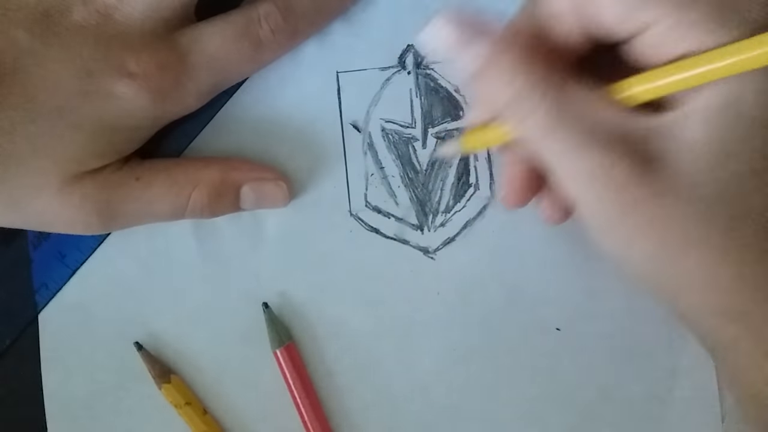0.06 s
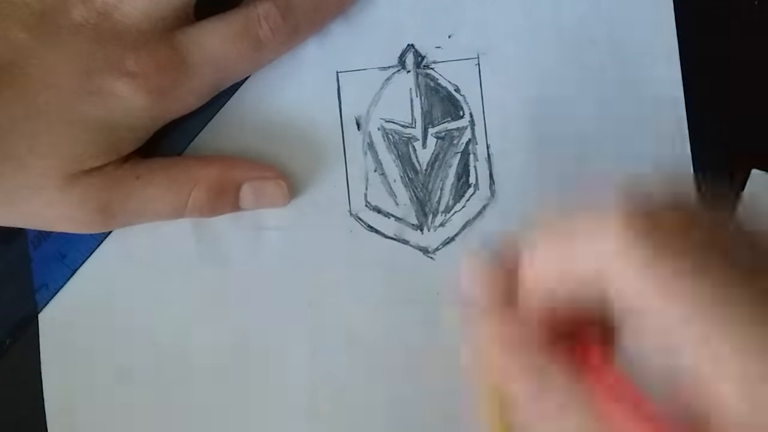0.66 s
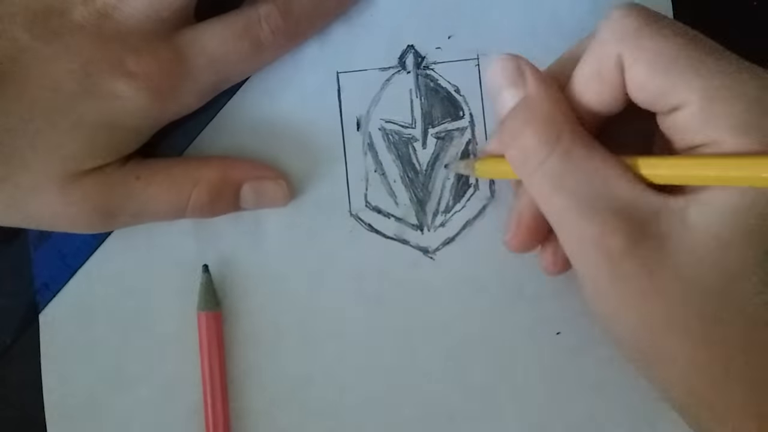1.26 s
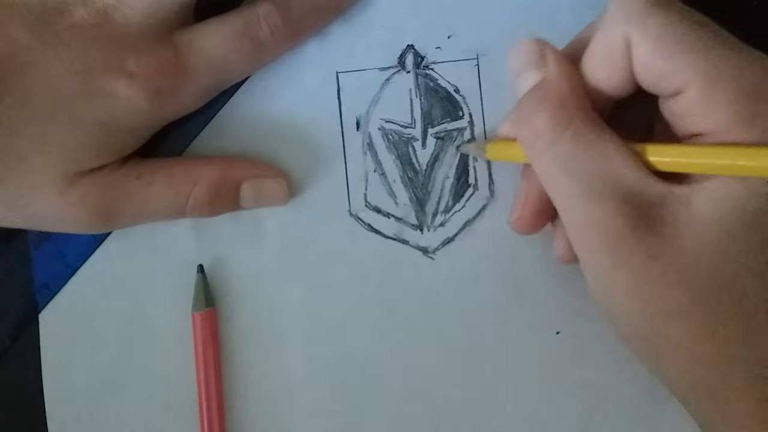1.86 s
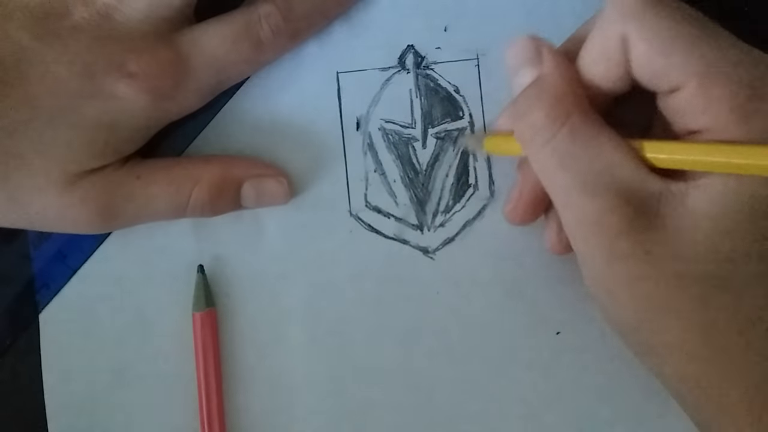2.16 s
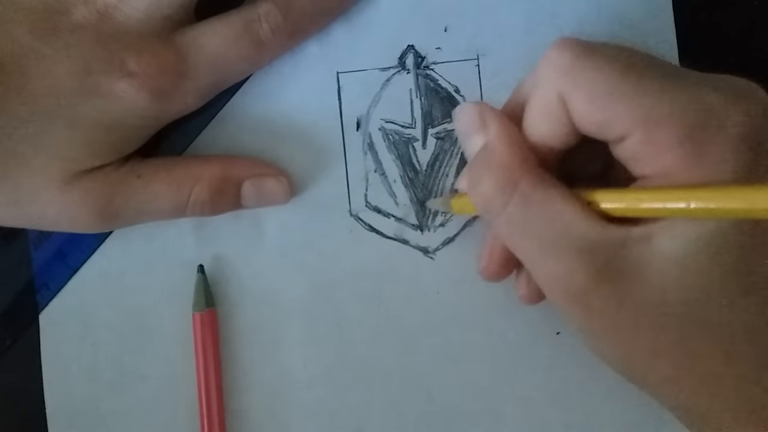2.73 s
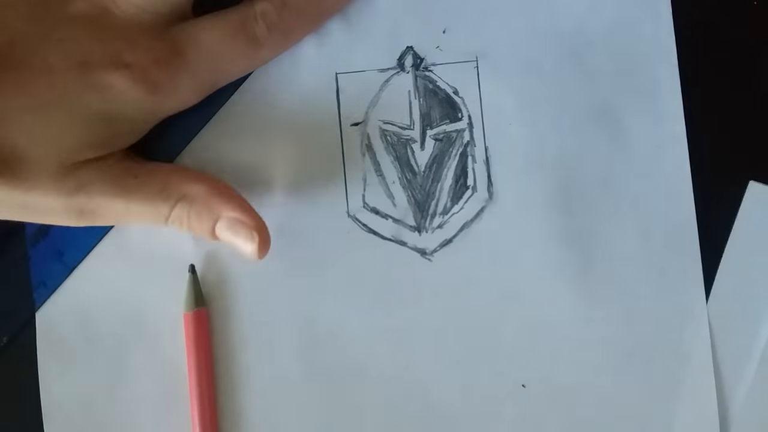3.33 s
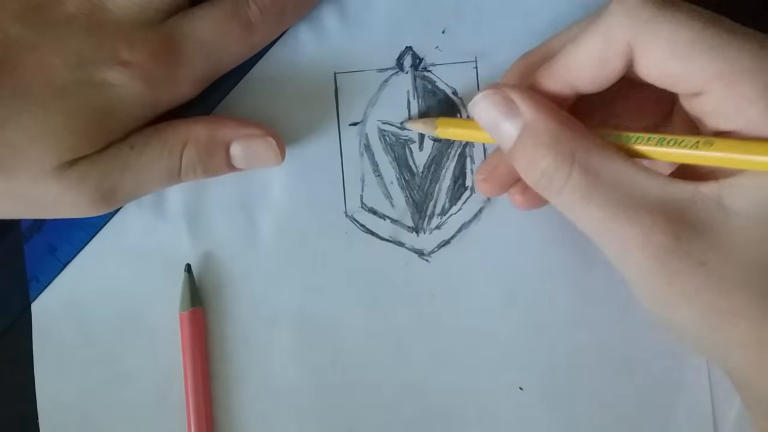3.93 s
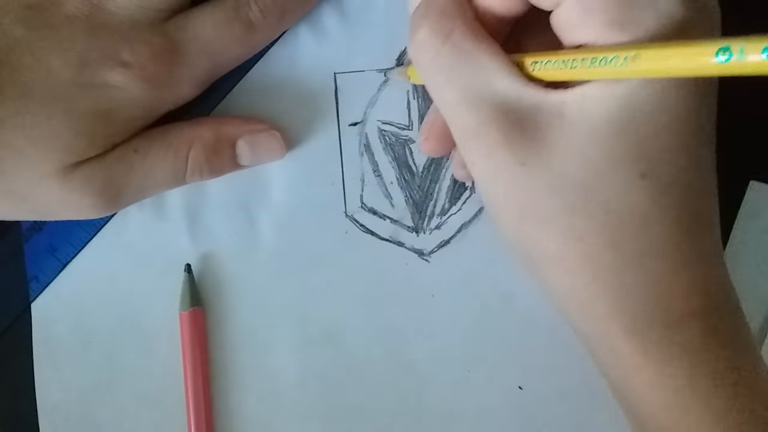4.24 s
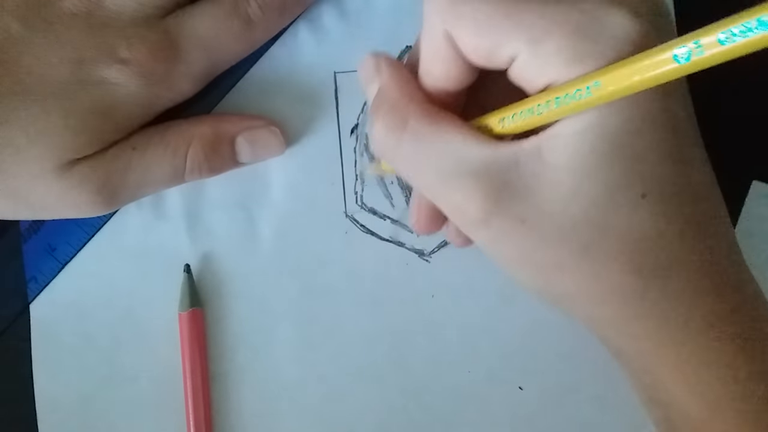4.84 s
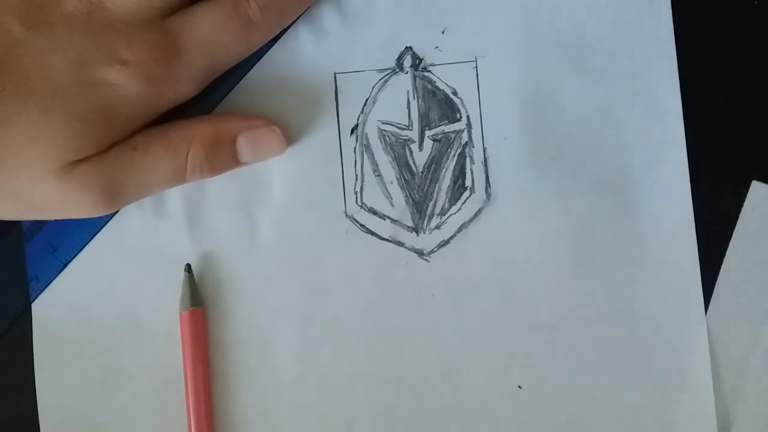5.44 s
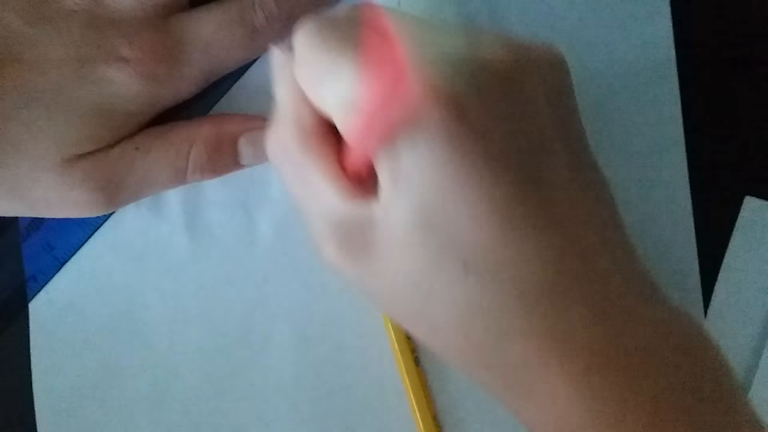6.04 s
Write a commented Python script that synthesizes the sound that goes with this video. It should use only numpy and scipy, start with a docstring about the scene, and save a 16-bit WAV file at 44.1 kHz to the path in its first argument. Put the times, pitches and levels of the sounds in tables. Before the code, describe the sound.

Close to the microphone, a wooden pencil is laid on a desk and another picked up, the barrels clacking sharply. Lead scratches faintly and paper rustles under a hand, with a thin, high hiss wandering above. A dull double bump falls midway, then the soft drawing resumes. Near the end the pencils clack and knock again. A small fan whirs and whines steadily in the quiet room.

```python
"""A desk in a quiet room, stereo microphone close to the hand of someone drawing.
Twice a wooden pencil is laid down and another picked up: the barrels clack together, knock on the desk
and tick lightly. The lead scratches, paper rustles under the hand, and one dull double bump
falls in between. A thin high hiss wanders while the hand works; behind it a small fan whirs and whines."""
import sys
import numpy as np
from scipy import signal
from scipy.fft import rfft, irfft
from scipy.io import wavfile
from scipy.ndimage import uniform_filter1d

SR = 44100
rng = np.random.default_rng(int(sys.argv[2]) if len(sys.argv) > 2 else 0)


def wav_out(sig):
    """Save sig, one row per channel (or a flat mono array), as 16-bit PCM at SR to the path in sys.argv[1]."""
    wavfile.write(sys.argv[1], SR, np.round(np.clip(np.atleast_2d(sig).T, -1, 1) * 32767).astype(np.int16))


N = 272979
T = np.arange(N) / SR
RING_T = T[:SR // 6]  # time axis of one hit
TOP_HZ = 15800

# likeness of the microphone's left and right ports: f/Hz, correlation
PORT_LIKENESS = [(60, 0.99), (250, 0.8), (600, 0.87), (800, .99), (2050, 0.99), (2400, 0.3), (3900, 0.41),
                 (5000, -0.12), (10000, -0.14)]
# spectrum of friction on paper: f/Hz, level/dB
PAPER_COLOUR = [(200, -20), (1000, 0.5), (2200, -1), (5000, 0.5), (9000, -0.5), (13000, -1), (16000, -14)]
# spectrum of a struck barrel: f/Hz, level/dB
CLACK_COLOUR = [(100, -29), (400, -14), (750, 0.5), (1150, 3.5), (2200, 5.5), (3700, 0), (5500, 2),
                (9000, 4.5), (15000, 3)]


def undb(db):
    """Decibels to gain."""
    return 10 ** (np.asarray(db) / 20)


def unit(x):
    """Scale to rms 1."""
    return x / np.sqrt(np.mean(x ** 2))


def blow(x, db):
    """Scale a hit so that its energy, spread over 10 ms, has this level."""
    return x * undb(db) / np.sqrt(np.sum(x ** 2) / (2 * SR / 100))


def along(points, hz):
    """Read a spectrum on a log-frequency axis."""
    f, value = np.transpose(points)
    return np.interp(np.log(hz + 1), np.log(f), value)


def colour(x, points, peak_hz=1000, lift_db=0, octaves=0.56):
    """Filter by a spectrum with one extra resonance; minimum phase keeps attacks sharp."""
    hz = np.fft.rfftfreq(2048, 1 / SR)
    resonance = np.exp(-.5 * (np.log2((hz + 1) / peak_hz) / octaves) ** 2)
    cepstrum = irfft(np.log(undb(along(points, hz) + lift_db * resonance)))
    cepstrum[1:len(hz) - 1] *= 2
    cepstrum[len(hz):] = 0
    impulse = irfft(np.exp(rfft(cepstrum)))
    return signal.fftconvolve(x, impulse[None], axes=1)[:, :x.shape[1]]


def radiate(x, hz):
    """High-pass: small things move little air below this frequency."""
    return signal.sosfilt(signal.butter(2, hz, "high", fs=SR, output="sos"), x)


def fade(t, t60):
    """Exponential decay, 60 dB in t60 seconds."""
    return np.exp(-np.log(1000) * t / t60)


def walk(rate):
    """Smooth random drift of rms 1, with `rate` new values a second."""
    step = int(SR / rate)
    held = np.repeat(rng.standard_normal(N // step + 1), step)
    return unit(uniform_filter1d(held, step)[:N])


def stereo_noise(n):
    """Noise at the two ports, alike in the bass and nearly unrelated in the treble."""
    likeness = np.clip(along(PORT_LIKENESS, np.fft.rfftfreq(n, 1 / SR)), -1, 1)
    mid, side = rfft(rng.standard_normal((2, n)))
    mid, side = mid * np.sqrt(1 + likeness), side * np.sqrt(1 - likeness)
    return unit(irfft(np.array([mid + side, mid - side]), n))


def sides(pan_db):
    """Gains of the two ports for a left-minus-right level."""
    return undb(np.array([[pan_db], [-pan_db]]) / 2)


def add(out, s, x):
    """Mix a sound in at s seconds."""
    i = int(s * SR)
    out[:, i:i + x.shape[1]] += x[:, :max(N - i, 0)]


def room(x, t60=0.12, wet_db=-17):
    """The close sound plus the short, faint tail of a small furnished room."""
    t = T[:SR // 2]
    tail = stereo_noise(len(t)) * fade(t, t60) * np.minimum(t / 0.0032, 1)
    tail *= undb(wet_db) / np.sqrt(np.sum(tail ** 2) / 2)
    return x + signal.fftconvolve(x, tail, axes=1)[:, :N]


def fan_tone(hz, db, waver_hz=2.2, port_lag_s=.00003):
    """A wavering fan tone that reaches the right port slightly later."""
    cycles = np.cumsum(hz + waver_hz * walk(24.91)) / SR
    phase = 2 * np.pi * (cycles - hz * np.array([[0], [port_lag_s]]))
    return np.sqrt(2) * undb(db + walk(8.6)) * np.sin(phase)


def fan(rush_db=-52, shade_db=1.5, whine_hz=4000):
    """Steady rush of air with motor and blade tones; the left port is shaded from its treble."""
    # spectrum of the rush, lower and upper part: f/Hz, level/dB
    low_rush = [(25, -42), (60, -20), (110, -12.5), (170, -4), (300, -2), (430, 2), (560, 5.5), (650, 1),
                (770, 12.5), (1100, 13), (1400, 4), (1620, 9), (1800, 3), (2050, 6.5)]
    high_rush = [(2200, 3), (2360, 7.5), (2650, 1), (2860, 8.5), (3150, 1), (3700, -2.5), (5000, -4.5),
                 (7000, -5), (10000, -8.5), (13000, -21), (16000, -29)]
    # motor and blade tones: f/Hz, level/dB, waver/Hz
    fan_tones = [(729, -65, 1.57), (1242, -67.5, 12.07), (1329, -64.5, 1.45), (1434, -72, 3.2),
                 (1552.2, -58, 1.62), (2004, -69.5, 15.87), (2840, -69, 9.2), (6676, -67.5, 1.32)]
    air = stereo_noise(N)
    rush = np.vstack([colour(port[None], low_rush + high_rush, 3400, lift_db, octaves=0.64)
                      for port, lift_db in zip(air, (-shade_db, shade_db))])
    tones = sum(fan_tone(hz, db, waver_hz) for hz, db, waver_hz in fan_tones)
    whine = fan_tone(whine_hz, db=np.interp(T, [1.13, 1.45], [-68, -75.5]))  # fades back early on
    return undb(rush_db + 0.5 * walk(8)) * unit(rush) + tones + whine


def thin_hiss(width_hz=430, skirt_hz=1150, port_phase=-2.7, diffuse_db=-5, patchy_db=2.3, wander_hz=170):
    """A grainy band of hiss that wanders twice through the high treble, out of step at the two ports."""
    # path of the band's centre in each pass: t/s, f/Hz, level/dB
    first_pass = [(1.19, 9300, -64), (1.21, 9450, -51), (1.36, 9200, -51.5), (1.46, 7500, -54.5),
                  (1.5, 8600, -59), (1.52, 10100, -52), (1.635, 10200, -52), (1.68, 15500, -56),
                  (1.73, 15000, -63), (1.785, 12400, -53), (1.89, 14100, -53.5), (2.05, 12400, -60),
                  (2.065, 12400, -47.5), (2.21, 13100, -51), (2.33, 10500, -53.5), (2.48, 8900, -61),
                  (2.6, 9700, -59), (2.8, 8500, -62), (3.03, 8800, -67), (3.11, 12000, -56),
                  (3.17, 15000, -73), (3.26, 13800, -60), (3.33, 12000, -74)]
    second_pass = [(4.43, 7700, -65), (4.55, 9500, -58), (4.6, 12800, -63), (4.7, 10200, -60),
                   (4.77, 14400, -66), (4.99, 10600, -57), (5.06, 12900, -63), (5.18, 11300, -55),
                   (5.31, 9000, -61), (5.35, 9500, -56), (5.44, 7900, -64)]
    noise = rng.standard_normal((3, N)) + 1j * rng.standard_normal((3, N))
    direct = noise[2] * np.exp(1j * np.array([[0], [port_phase]]))
    diffuse = undb(diffuse_db) * noise[:2]
    band = signal.sosfilt(signal.butter(1, width_hz, fs=SR, output="sos"), direct + diffuse)
    band = signal.sosfilt(signal.butter(2, skirt_hz, fs=SR, output="sos"), band)
    out, wander = np.zeros((2, N)), wander_hz * walk(30)
    for path, pan_db in ((first_pass, 5.5), (second_pass, 0)):
        s, hz, db = np.transpose(path)
        carrier = np.exp(2j * np.pi * np.cumsum(np.interp(T, s, hz) + wander) / SR)
        level = undb(np.interp(T, s, db)) * (T > s[0]) * (T < s[-1])
        out += unit((band * carrier).real) * sides(pan_db) * level
    flicker = unit(undb(patchy_db * (walk(38) + .5 * walk(600))))
    return out * flicker


def fibres(grain_db=3.0):
    """Noise of paper fibres catching and letting go."""
    return stereo_noise(N) * undb(grain_db * walk(900) + walk(60))


def paper(resting_db=-60.5, attack_s=0.013, release_s=0.029):
    """Grainy friction on paper: the resting hand, its shifts, and a pencil's short slides."""
    # the hand shifts: t/s, length/s, level/dB
    rubs = [(0.614, 0.71, -54), (2.03, 1.03, -58), (4.55, 0.72, -60.5), (5.73, 0.28, -56.5),
            (5.891, 0.31, -49.5)]
    # a pencil slides: t/s, length/s, level/dB
    slides = [(0.588, 0.03, -43), (3.046, 0.021, -48), (5.67, 0.067, -39.5), (6.152, 0.07, -41)]
    pressure = undb(resting_db)
    for s, length, db in rubs:
        swell = np.clip(np.minimum((T - s) / attack_s, (s + length - T) / release_s), 0, 1)
        pressure = np.maximum(pressure, undb(db) * swell)
    for s, length, db in slides:
        pressure = pressure + undb(db) * np.sin(np.pi * np.clip((T - s) / length, 0, 1))
    return pressure * unit(colour(fibres(), PAPER_COLOUR))


def scratching(bright_hz=12000, lift_db=6, uneven_db=2.5):
    """Quick bright strokes of the lead: each swells with speed and stops where the pencil turns."""
    # runs of strokes to and fro: t/s, length/s, stroke rate/Hz, level/dB
    runs = [(0.868, 0.15, 26, -48.5), (2.345, 0.69, 27.2, -56), (4.205, 1.1, 25.5, -60)]
    strokes = sum(undb(db) * np.sin(np.pi * rate * (T - s)) ** 4 * (T > s) * (T < s + length)
                  for s, length, rate, db in runs)
    pressure = strokes * undb(uneven_db * walk(27))
    return pressure * unit(colour(fibres(), PAPER_COLOUR, bright_hz, lift_db))


def ring(modes, detune, uneven_db):
    """Damped modes that start together, detuned at each blow and uneven between the ports."""
    hz, db, t60 = np.transpose(modes)[:, :, None]
    hz = hz * (1 + detune * rng.standard_normal(hz.shape))
    db = db + uneven_db * rng.standard_normal((2, len(modes), 1))
    return np.sum(undb(db) * fade(RING_T, t60) * np.sin(2 * np.pi * hz * RING_T), axis=1)


def bumps(push_s=0.0008, db_per_octave=11, scuff_db=-10):
    """Soft contacts on the desk: each builds over push_s, drives the modes near one pitch and scuffs."""
    # contacts: t/s, level/dB, favoured f/Hz
    contacts = [(3.413, -30, 1600), (3.422, -42, 3900), (3.427, -35, 540), (3.4285, -41, 2900),
                (3.4305, -42, 1000), (3.446, -44.5, 560), (3.722, -56, 250), (5.8148, -47, 280)]
    # what the bumps ring with: f/Hz, level/dB, t60/s
    bump_modes = [(302, -13, 0.058), (407, 0, 0.032), (551, 3, 0.036), (780, 4.5, 0.03), (955, 5.5, 0.045),
                  (1586, 4.5, 0.036), (2390, -0.5, 0.025), (2900, -8, 0.019), (3680, -9, 0.055),
                  (7100, -9, 0.029)]
    # spectrum of the scuff: f/Hz, level/dB
    scuff_colour = [(50, -36), (200, -12), (450, -8.0), (2800, -9.5), (7000, -13.5), (14000, -22)]
    out, push = np.zeros((2, N)), np.minimum(RING_T / push_s, 1)
    for s, db, contact_hz in contacts:
        modes = [(hz, mode_db - db_per_octave * abs(np.log2(hz / contact_hz)), t60)
                 for hz, mode_db, t60 in bump_modes]
        thud = radiate(push * ring(modes, detune=0.037, uneven_db=4.0), 0.8 * contact_hz)
        scuff = stereo_noise(len(RING_T)) * push * fade(RING_T, t60=0.17)
        add(out, s, blow(thud, db) + blow(colour(scuff, scuff_colour), db + scuff_db))
    return out


def barrel_modes(count=48):
    """Frequencies of a pencil's many bending and lengthwise modes, unevenly spread."""
    return (np.arange(count) + 1 + rng.random(count)) * TOP_HZ / count


def barrel_hit(modes_hz, t60, snap_db, scatter_db=-3, snap_t60=0.0017):
    """A hard contact: a snap, then the barrel's ringing and its scatter off things nearby."""
    t = RING_T[:SR // 16]
    drive = rng.standard_normal((2, len(modes_hz))) + 1j * rng.standard_normal((2, len(modes_hz)))
    drive[1] += (drive[0] - drive[1]) * along(PORT_LIKENESS, modes_hz)  # low modes agree at both ports
    ringing = unit((drive @ np.exp(2j * np.pi * modes_hz[:, None] * t)).real)
    body = (ringing + undb(scatter_db) * stereo_noise(len(t))) * fade(t, t60)
    snap = stereo_noise(len(t)) * fade(t, snap_t60)
    return blow(body, 0) + blow(snap, snap_db)


def ticks(modes_hz, pan_db=-8, lift_db=6):
    """Short dry ticks: a pencil turning in the fingers, a landing's bright edge, a clack's rebound."""
    # ticks, right of the microphone: t/s, level/dB, brightest resonance f/Hz
    dry_ticks = [(0.187, -50, 2120), (0.5434, -34.5, 2980), (1.0445, -43, 7600), (2.65, -48.5, 2200),
                 (5.959, -44, 2180), (5.9826, -38, 4170), (6.011, -43.5, 2300), (6.0295, -44.5, 2400),
                 (6.049, -43, 2200), (6.071, -38.5, 2200), (6.0875, -40, 2050), (6.1063, -42, 2100)]
    # spectrum of a tick: f/Hz, level/dB
    tick_colour = [(200, -14.5), (1400, 2.5), (2150, 3), (3200, -1), (4800, -3.5), (8500, -0.5),
                   (12000, -1), (16000, -6)]
    out = np.zeros((2, N))
    for s, db, hz in dry_ticks:
        tick = colour(barrel_hit(modes_hz, t60=0.01, snap_db=-6.5), tick_colour, hz, lift_db)
        add(out, s, blow(tick * sides(pan_db), db))
    return out


def slap(hz):
    """The first push of the desk top: one short swing of pressure."""
    u = np.pi * hz * RING_T - 2
    return np.tile((1 - 2 * u ** 2) * np.exp(-u ** 2), (2, 1))


def knocks(modes_hz, slap_db=-5, barrel_db=-10):
    """A pencil lands on the desk: the top slaps and rings, and the barrel rings more faintly."""
    # landings: t/s, level/dB
    landings = [(0.5420, -34.5), (0.5936, -44.5), (.5980, -44), (1.1204, -35.5), (5.6796, -34.5),
                (6.1450, -29.5), (6.1833, -40.5), (6.1855, -39)]
    # modes of the desk top: f/Hz, level/dB, t60/s
    desk_modes = [(560, -13, .02), (760, -1, 0.02), (1010, 6, 0.023), (1300, -2, 0.016), (1620, 4, 0.018),
                  (2000, 8, 0.023), (2400, 2, 0.016), (4150, -5, 0.02)]
    out = np.zeros((2, N))
    for s, db in landings:
        top = radiate(ring(desk_modes, detune=0.012, uneven_db=3), hz=700)
        knock = blow(top, 0) + blow(slap(hz=1800), slap_db)
        barrel = colour(barrel_hit(modes_hz, t60=0.12, snap_db=-12), CLACK_COLOUR)
        add(out, s, blow(knock, db))
        add(out, s, blow(barrel, db + barrel_db))
    return out


def clacks(modes_hz, firm_db=-31, firm_t60=0.037, doubling_db=9, width_hz=1470):
    """Barrel strikes barrel close to the microphone: a firm clack is dry, a lighter one chatters on."""
    # strikes: t/s, level/dB, brightest resonance f/Hz, snap re body/dB, left minus right/dB
    strikes = [(0.5443, -32, 9200, -4, 5), (0.551, -33.5, 3000, 1, -7), (0.6238, -32.5, 11500, -0.5, 5),
               (0.634, -32.5, 12600, -1, -5), (1.0409, -28.5, 3300, 1.5, -13),
               (1.0412, -28.5, 8200, 2.5, -14), (1.0712, -37.5, 12000, 0, 7),
               (1.0842, -35.5, 3000, 0.5, -13), (1.0870, -29, 12900, -8, 2), (1.1170, -33.5, 2020, -15, 0),
               (1.1502, -41.5, 8800, -9, 0), (5.6300, -28, 10200, -2, -3), (5.6434, -30, 10000, -9, -1),
               (5.6504, -33.5, 11600, -2, 3), (5.676, -40, 4100, -18, 0), (5.7477, -31, 5600, -4.5, 1.5),
               (5.7604, -38, 4230, -11, -1), (6.1484, -29, 13100, -4, 8), (6.155, -30.5, 11150, -15, -8)]
    out = np.zeros((2, N))
    for s, db, hz, snap_db, pan_db in strikes:
        t60 = firm_t60 * 2 ** ((firm_db - db) / doubling_db)
        lift_db = 8.5 + 2 * max(snap_db, 0)  # the hardest snaps drive the resonance harder
        octaves = np.log2(1 + width_hz / hz)
        clack = colour(barrel_hit(modes_hz, t60, snap_db), CLACK_COLOUR, hz, lift_db, octaves)
        add(out, s, blow(clack * sides(pan_db), db))
    return out


def scene():
    """The desk up close with the fan behind; only the hits carry the room's tail."""
    modes_hz = barrel_modes()
    hits = clacks(modes_hz) + knocks(modes_hz) + ticks(modes_hz) + bumps()
    return room(hits) + paper() + scratching() + thin_hiss() + fan()


def record(dry):
    """The recorder cuts the treble steeply above TOP_HZ."""
    return signal.sosfilt(signal.ellip(8, .2, 70, TOP_HZ, fs=SR, output="sos"), dry)


dry = scene()
out = record(dry)
wav_out(out)
```